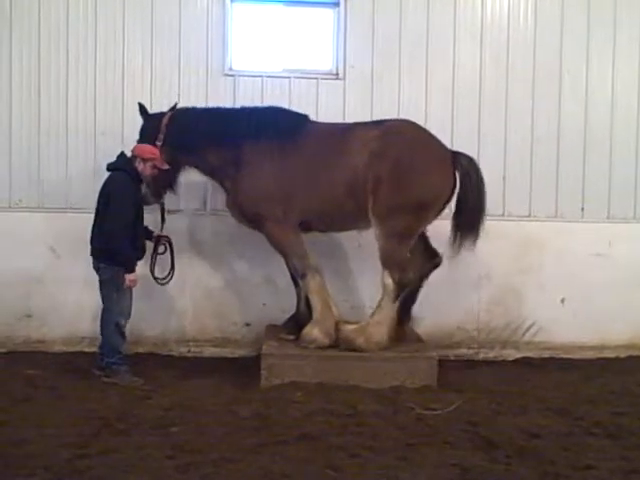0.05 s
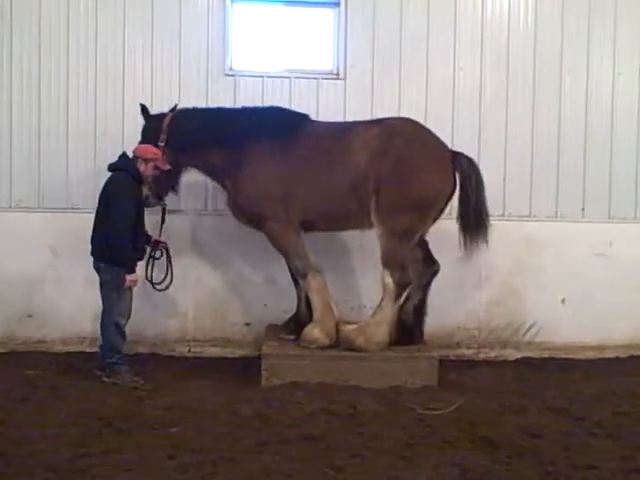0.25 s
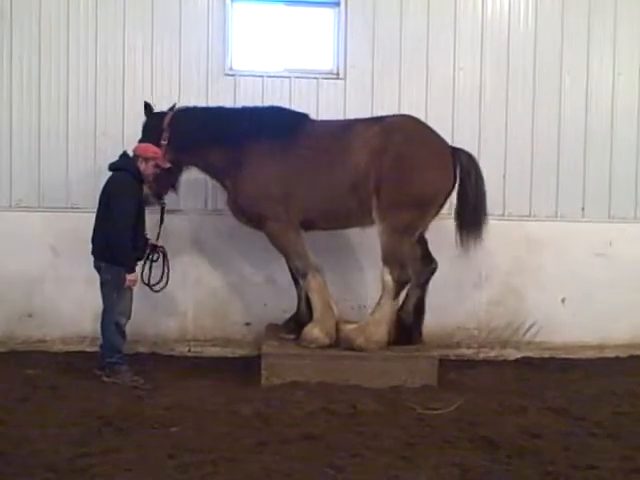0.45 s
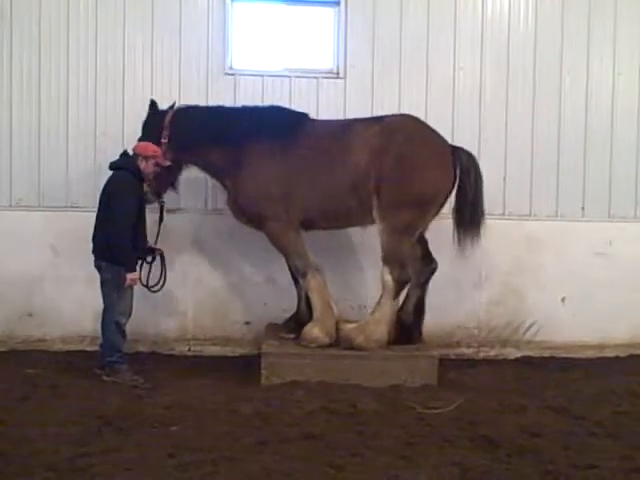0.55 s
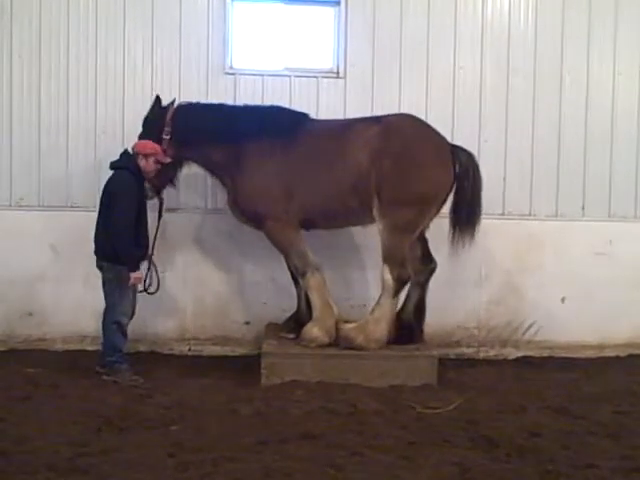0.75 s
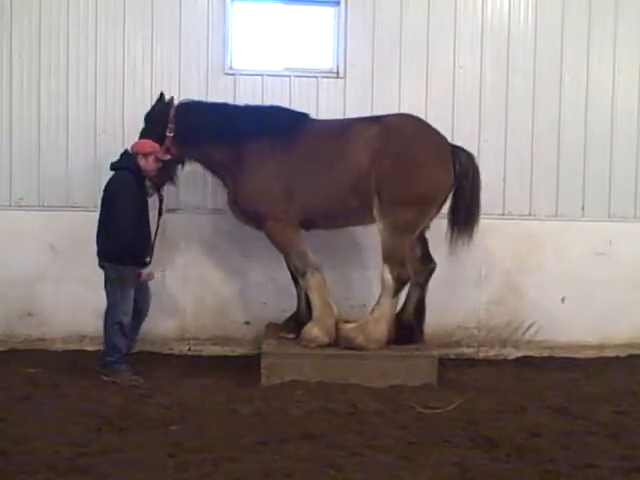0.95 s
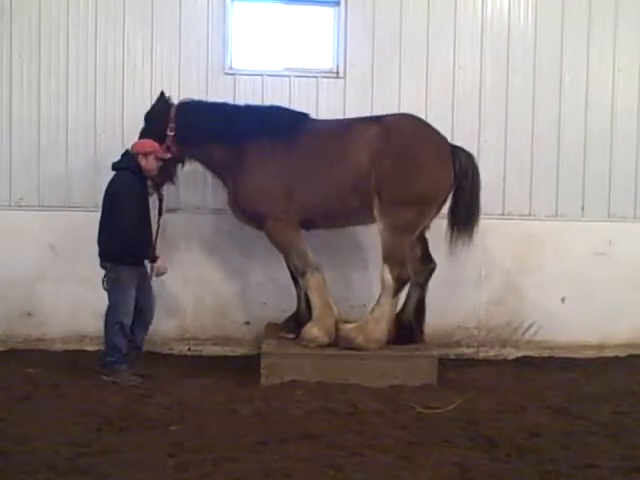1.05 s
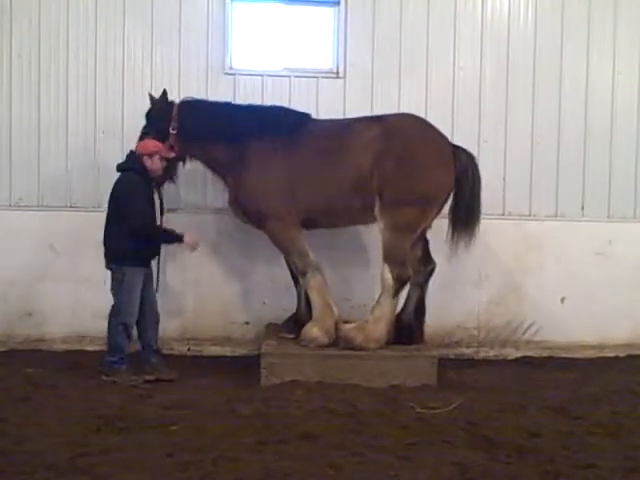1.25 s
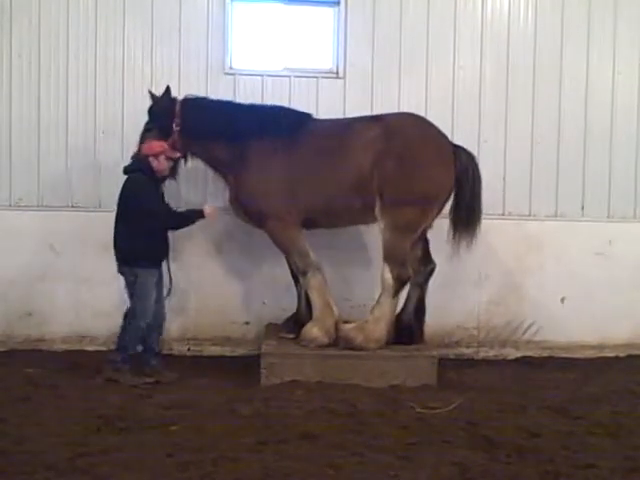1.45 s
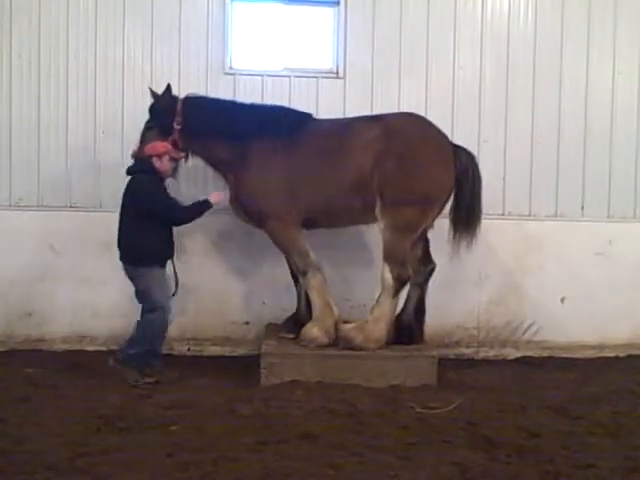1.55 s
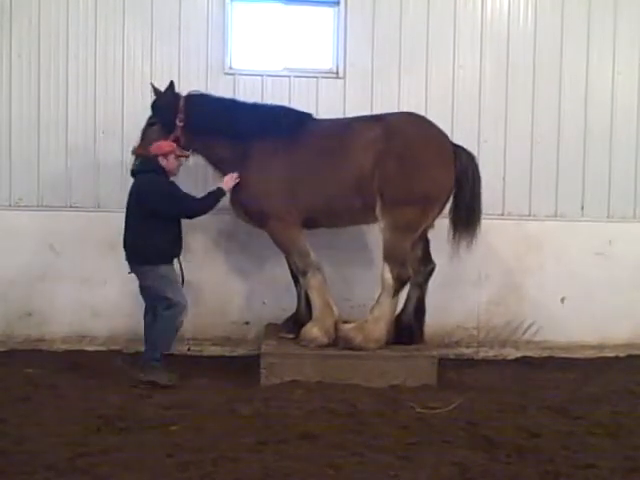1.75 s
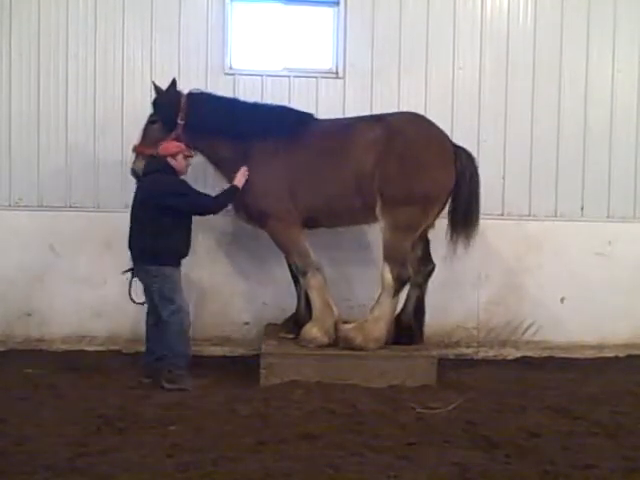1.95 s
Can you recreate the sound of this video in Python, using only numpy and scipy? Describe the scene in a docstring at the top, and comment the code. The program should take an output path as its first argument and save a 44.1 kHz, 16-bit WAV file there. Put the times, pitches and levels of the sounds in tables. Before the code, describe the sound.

A heavy horse hoof lands on a hollow wooden platform at about 0.25 seconds, with a short crack, a low boom and a slight crunch of sand. The thud echoes through an indoor arena, fading over about a second. A small dry click comes close by at 0.9 seconds, then faint soft bumps until 2 seconds, with a brief jacket rustle near 1.65. Quiet hiss lies underneath.

```python
"""Faint hiss, a soft bump and a hollow ring open on an indoor riding arena. At 0.24 s a draught horse
sets a hind hoof down on a low wooden platform: horn cracks on wood, the hollow box booms, the boards
rattle, and the hoof rocks flat and grinds sand. The hall answers with echoes and a dull tail.
At 0.86 s comes a dry click close by, then a row of soft bumps, with a brief jacket rustle near 1.65 s."""
import sys
import numpy as np
from scipy import signal
from scipy.fft import rfft, irfft
from scipy.io import wavfile

SR = 44100
rng = np.random.default_rng(int(sys.argv[2]) if len(sys.argv) > 2 else 0)


def waveform_to_disk(signal):
    """Save audio, clipped to [-1, 1], as 16-bit WAV at the path in sys.argv[1]."""
    frames = np.transpose(np.atleast_2d(signal))
    scaled = np.clip(frames, -1, 1) * 32767
    samples = np.round(scaled).astype(np.int16)
    wavfile.write(sys.argv[1], SR, samples)


N = 88200

# hoof landing, rocking flat, taking the weight, a last tick: start_s, push_db, contact_s, crack_db
HOOF_CONTACTS = [(0.2407, -.5, .001, 0), (0.2555, -23, .0005, -9), (0.2803, -32, .002, -10),
                 (0.2907, -12.4, .0096, -30), (0.2952, -6.6, .0046, -28), (0.3331, -36, .001, -8)]
# resonances of the wooden box: pitch_hz, level_db, t60_s
PLATFORM_MODES = [(31.4, -20, .27), (60.9, -20, .34), (122, -24, .25), (150, -16, .155), (176, -21, .16),
                  (250, -26, .15), (325, -31, .2), (480, -33, .13), (540, -30, .17), (658, -35, .17),
                  (865, -39, .1), (1686, -35, .08), (2080, -35, .06), (2356, -34, .07), (2795, -34, .05)]
# tone of horn cracking on sandy wood: frequency_hz, relative_db
CRACK_SPECTRUM = [(200, 17), (600, -1.5), (1100, -10.5), (2000, 4), (3400, -13), (5400, -8), (6400, -16),
                  (10000, -16), (16000, -23.5)]
# sand crunches under the hoof: centre_s, width_s, level_db
SAND_CRUNCHES = [(0.2555, 0.0075, -44.5), (0.283, .007, -72), (0.3445, 0.0059, -52.5), (0.365, 0.026, -67),
                 (0.66, 0.11, -72.5)]
# tone of the sand: frequency_hz, relative_db
SAND_SPECTRUM = [(500, -21), (2000, 12), (5000, 7), (8000, 4), (10500, -0.5), (14000, 7), (16000, -15)]

# slaps of the boom off walls and roof: delay_s, gain_db
WALL_ECHOES = [(.109, -12), (.155, -21), (.202, -24), (.276, -27)]
# the hall's diffuse tail, from lows to highs: frequency_hz, level_db, t60_s, rise_s
TAIL_CURVES = [(27.8, -47.5, 1.3, 0.068), (50, -38, 1.2, 0.11), (80, -50.5, 1.44, 0.069),
               (125.6, -33, 0.81, 0.043), (160, -32, 1.01, 0.084), (224, -33, 0.91, 0.03),
               (305.6, -40.5, 0.78, 0.058), (436, -49, 1.11, 0.072), (580, -48.5, 1.15, .04),
               (1000, -55.5, 1.25, 0.011), (1667, -55, 1.82, 0.0067), (3140, -63.5, 1.02, 0.0082),
               (6000, -62, 0.89, 0.032), (13800, -62.5, 0.35, 0.018)]
# standing wave that lingers in the hall: pitch_hz, level_db, t60_s
STANDING_WAVE = [(160, -34, 1.3)]
# faint hollow ring, fullest before the hoof lands: centre_s, width_s, level_db
HOLLOW_SWELL = [(0.05, .12, -69.5)]
# tone of the hollow ring: frequency_hz, relative_db
HOLLOW_SPECTRUM = [(150, -11), (330, -2.5), (520, 1.5), (750, -19), (2500, -18.5), (8000, -59)]

# tone of the click's snap: frequency_hz, relative_db
CLICK_SPECTRUM = [(300, -16), (740, -30), (950, 12), (1700, 3), (2400, -4), (3200, -4), (9000, -5.5),
                  (14000, -4.5), (16000, -8)]
# ring of the click: pitch_hz, level_db, t60_s
CLICK_RING = [(878, -55, 0.071), (2367, -43, 0.021), (4100, -51, 0.013)]
# soft bumps close by: start_s, thump_db, tick_db
BUMP_HITS = [(0.035, -53, -64.5), (0.906, -50, -60.5), (1.137, -50.5, -72), (1.273, -54.5, -64.5),
             (1.407, -52, -56.5), (1.512, -61, -61), (1.675, -56, -63), (1.796, -53.5, -67),
             (1.904, -53, -62.5), (1.987, -66, -63)]
# body of each thump: pitch_hz, relative_db, t60_s
THUMP_MODES = [(84.6, -3.5, 0.023), (154, 5, 0.023), (294, -2, 0.038), (616, 6, 0.0093)]
# tone of the tick on each bump: frequency_hz, relative_db
TICK_SPECTRUM = [(400, 4), (1000, 1.5), (2400, -6), (3500, -13), (14000, -22.5)]
# jacket rustles: centre_s, width_s, level_db
JACKET_SWELLS = [(1.643, 0.015, -64), (1.685, 0.014, -71)]
# tone of the cloth: frequency_hz, relative_db
JACKET_SPECTRUM = [(400, 7), (1500, -3), (4000, -3), (8000, -2.5), (13000, -0.5), (16000, -6)]
# tone of the background: frequency_hz, relative_db
ROOM_TONE_SPECTRUM = [(15, -6), (25, 5.5), (53, 2), (160, -3), (523, -8.5), (648, -8.5), (826, -13.5),
                      (1140, -13.5), (2170, -16), (8810, -22), (13900, -23), (15500, -25)]

LANDING_S = HOOF_CONTACTS[0][0]


def platform_boom():
    """Every hoof contact rings the hollow box; the longer the contact, the duller the boom."""
    out = np.zeros(N)
    for start_s, push_db, contact_s, _ in HOOF_CONTACTS:
        # the lowest mode swings against the others
        boards = ring(PLATFORM_MODES[1:], start_s) - ring(PLATFORM_MODES[:1], start_s)
        out += undb(push_db) * soften(boards, 1 / contact_s)
    return out


def hoof_cracks(crack_db=-22, rattle_db=-32.5):
    """Horn cracks on wood at each contact, and the boards rattle briefly after the landing."""
    cracks = sum(undb(crack_db + db) * fade(start_s, t60_s=.0064) for start_s, _, _, db in HOOF_CONTACTS)
    rattle = undb(rattle_db) * fade(LANDING_S, t60_s=.17)
    return (cracks + rattle) * noise(CRACK_SPECTRUM)


def sand_grind():
    """Sand ground under the hoof crunches in short, gritty swells."""
    return swells(SAND_CRUNCHES) * noise(SAND_SPECTRUM, grain_db=4.5)


def wall_echoes(boom):
    """Near walls and roof throw back dull copies of the boom; the far wall returns one narrow band, late."""
    dull = soften(boom, cutoff_hz=262)
    near = sum(undb(db) * delayed(dull, delay_s) for delay_s, db in WALL_ECHOES)
    narrow = signal.lfilter(*signal.iirpeak(165, Q=4, fs=SR), boom)
    return near + undb(-29) * delayed(narrow, delay_s=.458)


def hall_tail(predelay_s=.0027, far_wall_s=.46, far_width_s=.03, far_db=-7.5):
    """The landing's reverb: half-octave bands bloom and die at their own rates, the lows coming late."""
    out = np.zeros(N)
    octave = np.log2(np.maximum(np.fft.rfftfreq(N, 1 / SR), 1))
    white = rfft(rng.standard_normal(N))
    far_wall_swell = 1 + swells([(LANDING_S + far_wall_s, far_width_s, far_db)])  # a smeared late return
    for hz in 28 * 2 ** (np.arange(20) / 2):
        band_shape = np.maximum(1 - 2 * abs(octave - np.log2(hz)), 0)
        band = irfft(white * band_shape, N)
        db, t60_s, rise_s = (on_log_axis(hz, TAIL_CURVES, column) for column in (1, 2, 3))
        envelope = far_wall_swell * fade(LANDING_S + predelay_s, t60_s, rise_s)
        out += undb(db) * envelope * band / band.std()
    return out


def standing_wave():
    """One low note builds in the hall after the landing and hangs on."""
    return ring(STANDING_WAVE, LANDING_S, rise_s=.15)


def dry_click(start_s=.8616, rise_s=.00036):
    """A close, dry snap of noise with a short, bright ring."""
    snap = undb(-40) * fade(start_s, t60_s=.02, rise_s=rise_s) * noise(CLICK_SPECTRUM)
    return snap + ring(CLICK_RING, start_s, rise_s)


def soft_bumps():
    """Close, dry bumps, each a damped thump with a tick of noise on top."""
    out = np.zeros(N)
    tick = noise(TICK_SPECTRUM)
    for start_s, thump_db, tick_db in BUMP_HITS:
        out += undb(thump_db) * ring(THUMP_MODES, start_s, rise_s=.0012)
        out += undb(tick_db) * fade(start_s, t60_s=.068) * tick
    return out


def jacket_rustle():
    """Cloth rubs in two quick, grainy brushes."""
    return swells(JACKET_SWELLS) * noise(JACKET_SPECTRUM, grain_db=6.5)


def hollow_ring():
    """A faint swell of hollow-toned noise in the hall as the scene opens."""
    return swells(HOLLOW_SWELL) * noise(HOLLOW_SPECTRUM)


def room_tone():
    """A steady bed of faint hiss and rumble."""
    return undb(-67) * noise(ROOM_TONE_SPECTRUM)


def ring(modes, start_s, rise_s=0):
    """Damped sines from rows of pitch_hz, level_db, t60_s, struck at start_s."""
    age = np.arange(N) / SR - start_s
    return sum(undb(db) * fade(start_s, t60_s, rise_s) * np.sin(2 * np.pi * hz * age)
               for hz, db, t60_s in modes)


def noise(spectrum, grain_db=0):
    """Coloured noise of rms 1; grain breaks it into a crackle of uneven, 8-sample specks."""
    white = rng.standard_normal(N)
    specks = undb(grain_db * np.repeat(rng.standard_normal(N // 8 + 1), 8)[:N])
    colour = undb(on_log_axis(np.fft.rfftfreq(N, 1 / SR), spectrum))
    x = irfft(rfft(white * specks) * colour, N)
    return x / x.std()


def fade(start_s, t60_s, rise_s=0):
    """Envelope that opens at start_s and falls 60 dB in t60_s."""
    age = np.maximum(np.arange(N) / SR - start_s, 0)
    attack = 1 - np.exp(-age / max(rise_s, 1 / SR))
    return attack * np.exp(-np.log(1000) * age / t60_s)


def swells(rows):
    """Bell-shaped envelopes from rows of centre_s, width_s (one sigma), level_db."""
    t = np.arange(N) / SR
    return sum(undb(db) * np.exp(-.5 * ((t - centre_s) / width_s) ** 2) for centre_s, width_s, db in rows)


def soften(x, cutoff_hz):
    """Gentle low-pass."""
    return signal.sosfilt(signal.butter(2, min(cutoff_hz, SR / 3), fs=SR, output="sos"), x)


def delayed(x, delay_s):
    """The same sound, arriving later."""
    return np.interp(np.arange(N) - delay_s * SR, np.arange(N), x)


def on_log_axis(hz, points, column=1):
    """Read a table by frequency, joining its rows on a log axis."""
    points = np.array(points, float)
    return np.interp(np.log(np.maximum(hz, 1)), np.log(points[:, 0]), points[:, column])


def undb(db):
    """Decibels to gain."""
    return 10 ** (np.asarray(db) / 20)


def scene():
    """Mono mix: the hoof fall, its hall, the close sounds too quiet to wake the hall, and room tone."""
    boom = platform_boom()
    hall = wall_echoes(boom) + hall_tail() + standing_wave() + hollow_ring()
    hoof = boom + hoof_cracks() + sand_grind()
    close = dry_click() + soft_bumps() + jacket_rustle()
    return (hoof + hall + close + room_tone())[None]


def record(dry, low_cut_hz=18, high_cut_hz=15900):
    """Roll off the deepest rumble and cut the very top steeply."""
    x = signal.sosfilt(signal.butter(2, low_cut_hz, "high", fs=SR, output="sos"), dry)
    return signal.sosfilt(signal.ellip(10, .2, 70, high_cut_hz, fs=SR, output="sos"), x)


dry = scene()
out = record(dry)
waveform_to_disk(out)
```